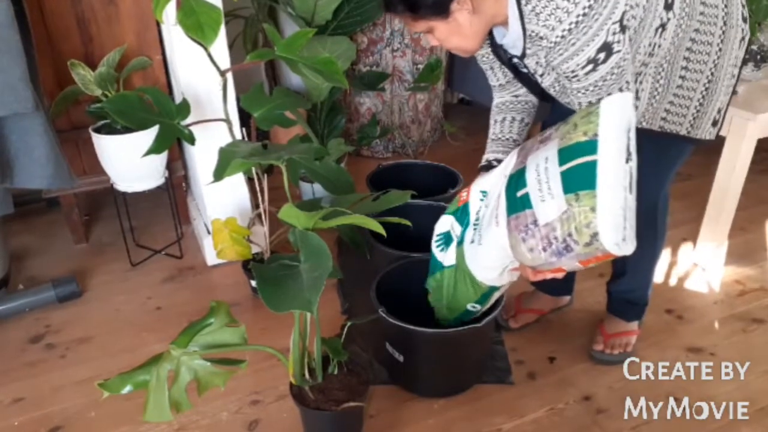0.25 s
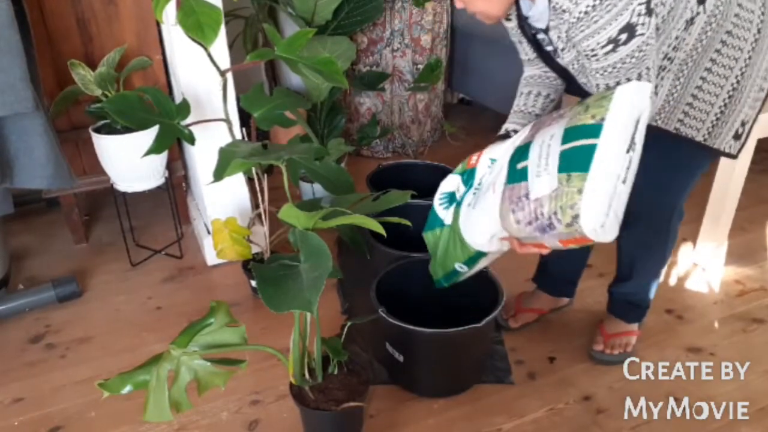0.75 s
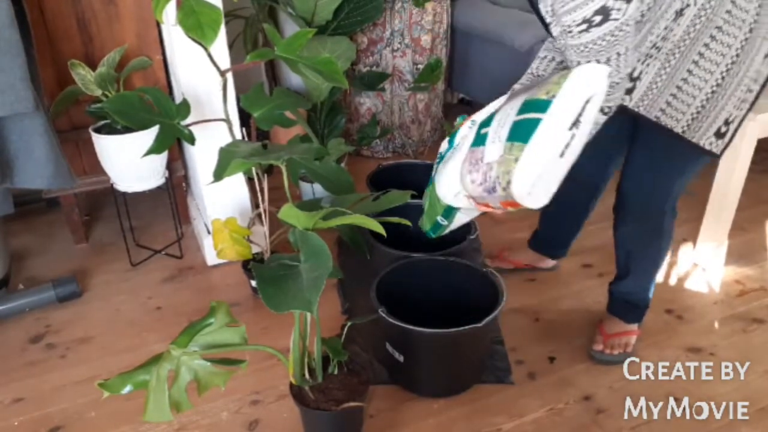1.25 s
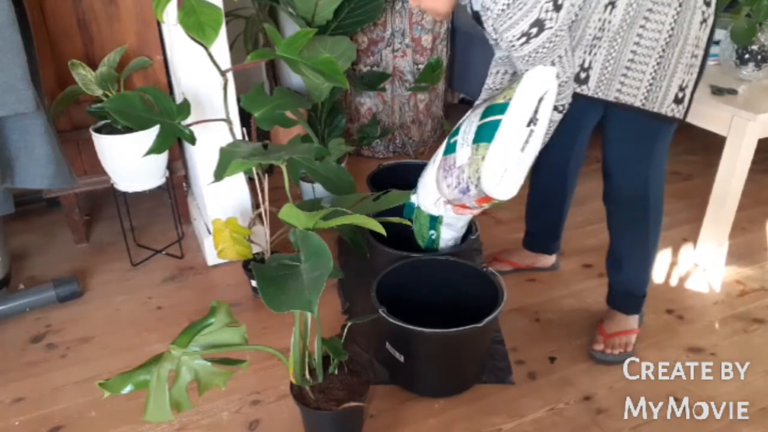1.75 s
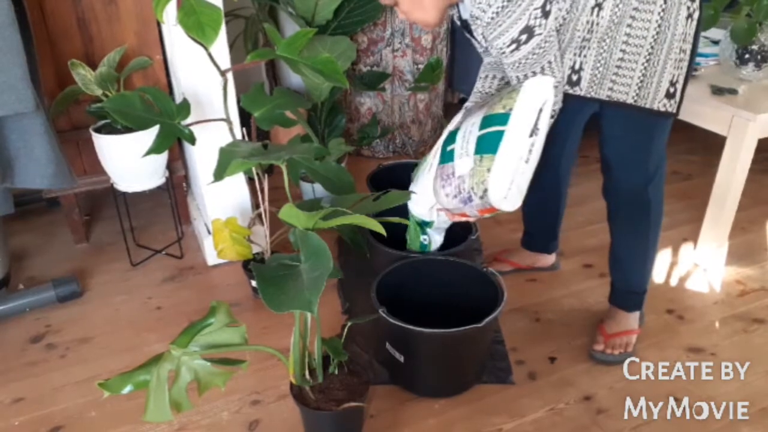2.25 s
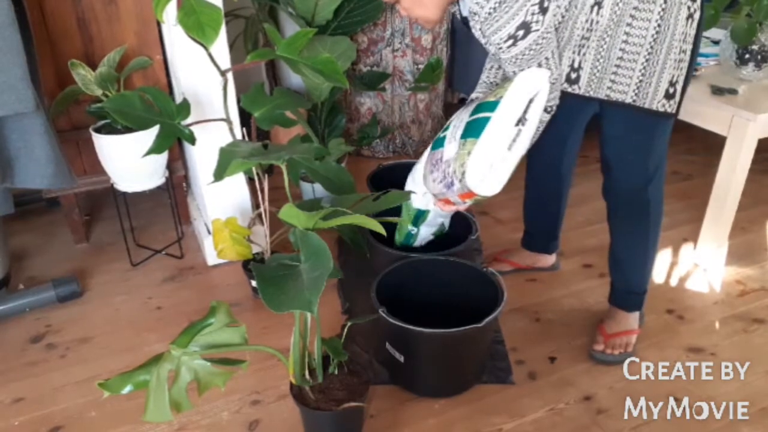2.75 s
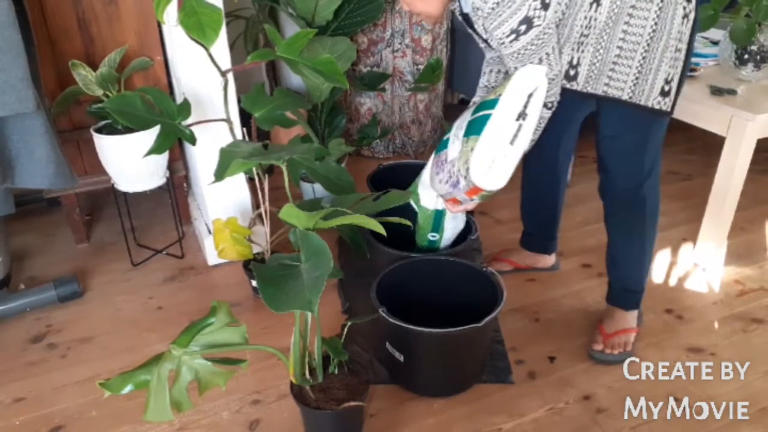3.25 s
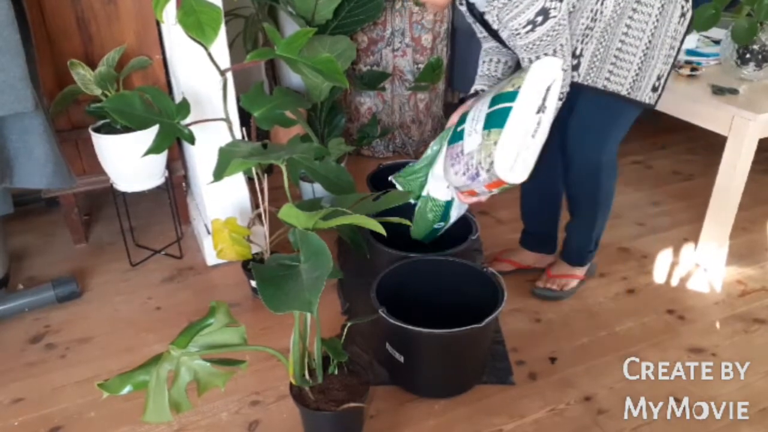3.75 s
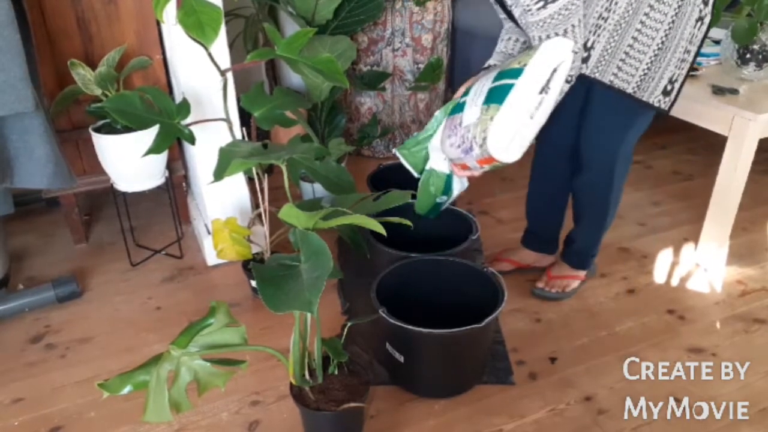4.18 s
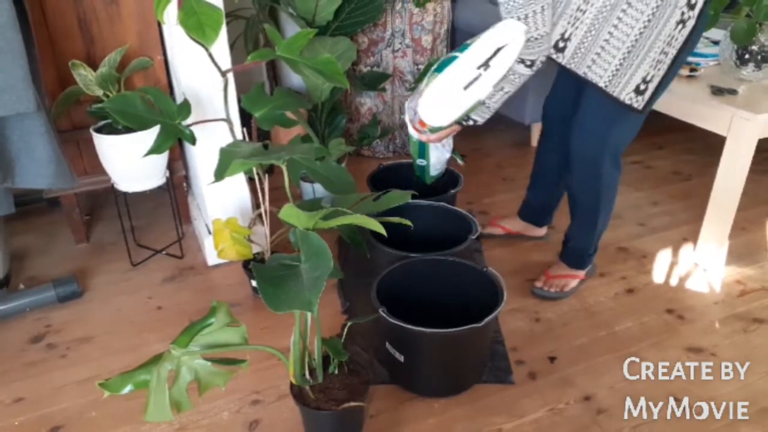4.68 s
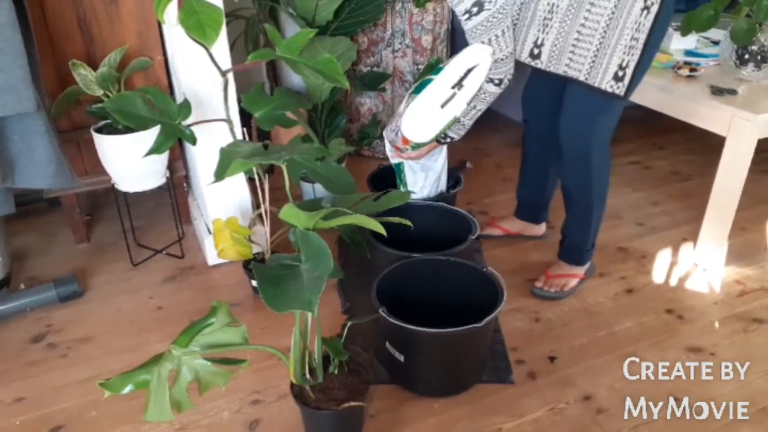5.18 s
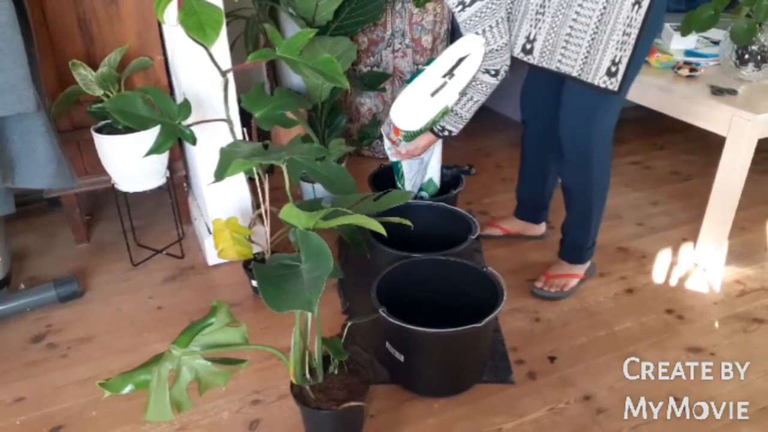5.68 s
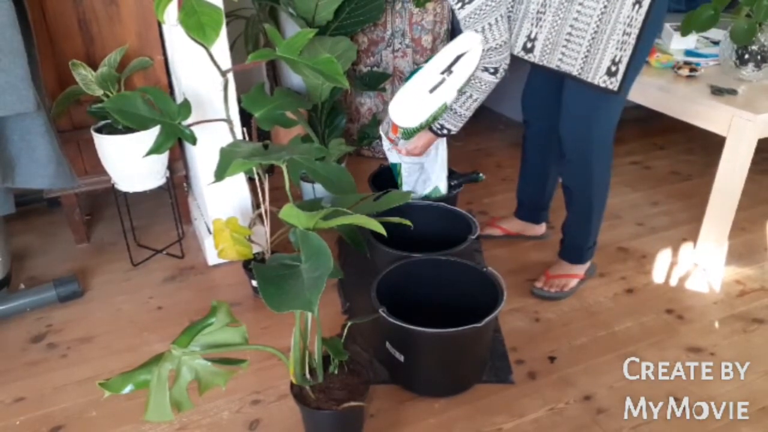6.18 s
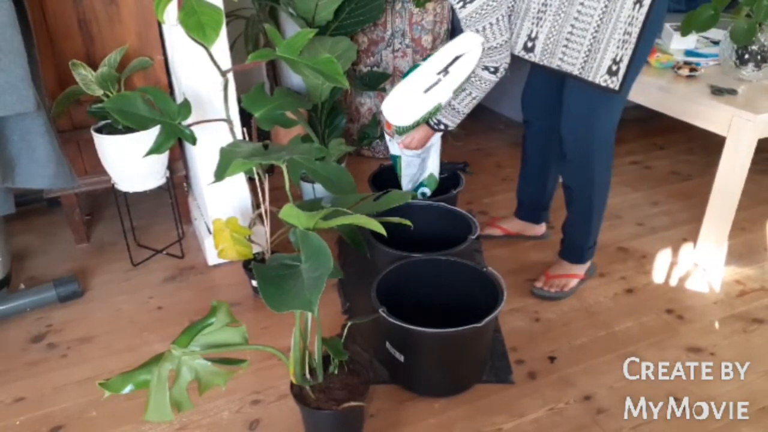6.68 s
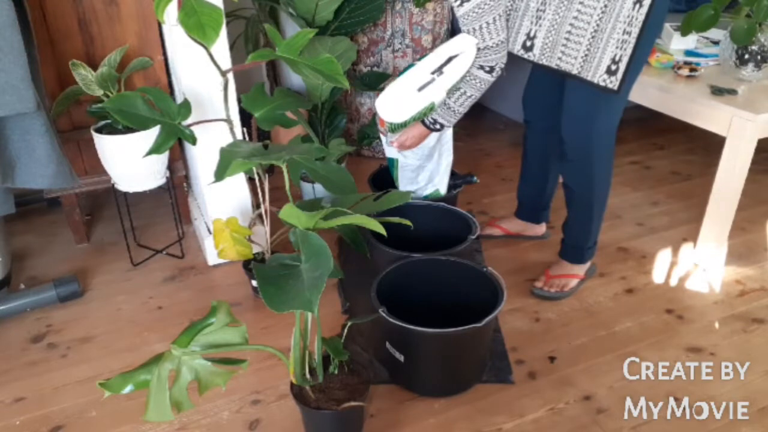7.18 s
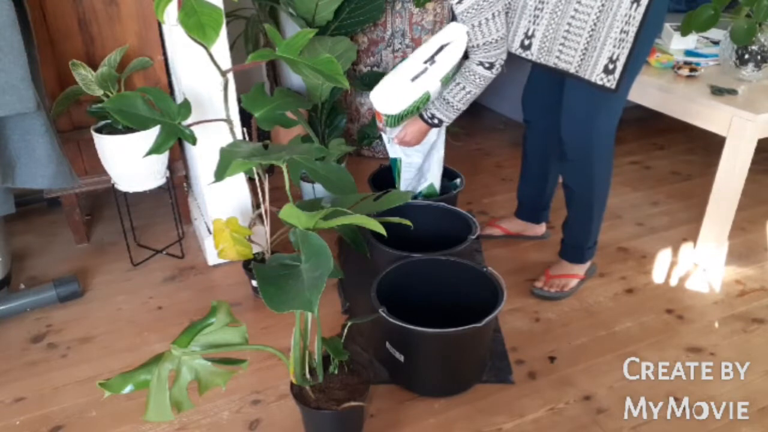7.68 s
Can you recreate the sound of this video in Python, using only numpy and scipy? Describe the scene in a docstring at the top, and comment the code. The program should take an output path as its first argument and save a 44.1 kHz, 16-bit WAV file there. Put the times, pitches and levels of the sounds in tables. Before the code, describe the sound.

Soil pours in uneven bursts from a rustling plastic bag, landing in plastic pots with knocks and hollow thumps.

```python
"""Potting soil shaken into pots

A plastic bag of soil is shaken over deep plastic pots in a room with a wooden floor.
The film crinkles and snaps as its creases let go. Crumbs patter and clods knock on the pot wall,
the air in the pot booms under the sliding soil, and heavy loads thud on the pot bottom."""
import sys
import numpy as np
from scipy import signal
from scipy.fft import rfft, irfft
from scipy.io import wavfile
from scipy.ndimage import uniform_filter1d

SR = 44100
rng = np.random.default_rng(int(sys.argv[2]) if len(sys.argv) > 2 else 0)


def generate_wav(signal):
    """Clip the signal to [-1, 1] and save it as 16-bit WAV at the path in sys.argv[1]."""
    frames = np.transpose(np.atleast_2d(signal))
    scaled = np.clip(frames, -1, 1) * 32767
    pcm = np.round(scaled).astype(np.int16)
    wavfile.write(sys.argv[1], SR, pcm)


N = 349713

# shakes of the bag: peak t/s, hold/s, crinkle/dB, patter/dB, pot air boom/dB, rise/s, fall/s
BAG_MOVES = [(0, 0.28, -49.5, -45.5, -47, .1, 0.31), (.5, 0.027, -57, -50.5, -48, 0.096, 0.23),
             (.804, .002, -66, -60.5, -90, 0.0045, 0.13), (0.998, .01, -62, -78, -82, 0.069, 0.11),
             (1.279, .005, -55.5, -50, -61.5, 0.1, .08), (1.59, 0.079, -39.5, -38.5, -47, 0.24, 0.65),
             (2.014, 0.013, -53.5, -45.5, -41, 0.99, 0.22), (2.19, 0.036, -73, -55.5, -52.5, 0.085, 0.26),
             (2.439, 0.0018, -59, -60, -57, 0.0022, 0.017), (2.518, 0.016, -56, -51.5, -51, 0.1, 0.43),
             (2.795, 0.071, -49.5, -46.5, -47.5, 0.23, 1), (3.114, .2, -51, -50.5, -52.5, 0.14, 0.38),
             (3.64, 0.077, -62.5, -69, -69, 0.042, 0.08), (3.785, .01, -59, -54.5, -44, 0.026, 0.23),
             (4.149, .002, -57, -63.5, -55, .004, 0.1), (4.25, 0.22, -65.5, -71, -64.5, 0.09, .09),
             (4.55, 0.058, -99, -76, -67, 0.14, 0.11), (4.716, 0.055, -65.5, -60, -58, 0.11, 0.23),
             (4.836, 0.09, -59, -58, -64, .01, 0.28), (4.965, .01, -47, -49, -50.5, 0.096, 0.32),
             (5.097, 0.022, -44.5, -41, -41, .1, 0.93), (5.493, 0.28, -55, -56, -63, 0.46, .5),
             (5.939, 0.38, -53.5, -52.5, -54.5, 0.061, 0.43), (6.498, .005, -61, -53.5, -50, 0.066, 0.26),
             (6.651, 0.027, -56.5, -53.5, -53.5, .1, 0.34), (7.1, 0.13, -49, -47.5, -47, 0.4, 0.56),
             (7.426, .005, -53, -49.5, -62, 0.062, 0.13), (7.618, 0.09, -56, -55, -53.5, 0.02, 0.19),
             (7.92, .01, -56.5, -52.5, -54.5, 0.61, .1)]
# single creases popping: t/s, level/dB, top band relative to main band/dB
CREASE_SNAPS = [(0.2524, -41, -10), (0.495, -37, -7), (0.7317, -52.5, 0), (0.8031, -44, -19.5),
                (.982, -54, -4), (1.2146, -54, -10), (1.387, -45, 12), (1.4167, -30.5, -12),
                (1.595, -22.5, 2), (1.8627, -26.5, -1), (2.2548, -48, -8), (2.436, -41.5, 1),
                (2.493, -38.5, -12), (2.5086, -48, -6), (2.533, -32, -7), (2.553, -32.5, 1.5),
                (2.584, -42, -6), (2.6984, -30, -7), (2.729, -35, -6), (2.7337, -35, 0), (2.7875, -33, 4),
                (2.794, -28, -9), (2.8014, -30, 3), (2.812, -30, -8), (2.902, -39, -1), (2.93, -40, -1),
                (3.075, -40, 1), (3.3185, -27, -18), (3.505, -40, -16), (3.6215, -35.5, -12),
                (3.6563, -39, -10.5), (3.799, -41, -1), (4.0347, -52, -20), (4.15, -42, -1),
                (4.235, -37, -6), (4.329, -54, -2.5), (4.8382, -38.5, -13.5), (4.914, -45, -6),
                (4.968, -36, 7.5), (5.0524, -32, -3), (5.097, -23, -6), (5.355, -28, -14), (5.951, -38, -6),
                (6.5073, -34, 2), (7.0913, -39, 10), (7.196, -33, 4), (7.33, -34, -4), (7.44, -37, -4),
                (7.6256, -41, -10), (7.6854, -33.5, -3)]
# sudden slides of soil against the pot wall: t/s, front/dB, patter behind it/dB, hold/s, fall/s
SOIL_SLIDES = [(.163, -41, -45.5, .02, 0.069), (0.634, -51, -55.5, 0.032, 0.052),
               (1.546, -23.5, -32.5, .16, 0.11), (2.168, -50, -47, 0.032, 0.06),
               (3.421, -40.5, -47, .005, 0.19), (3.792, -46, -47, 0.048, 0.11),
               (4.692, -56, -65, .01, 0.084), (5.097, -20, -35.5, 0.023, 0.5)]
# heavy loads landing in the pot: t/s, bottom thud/dB, air boom/dB, landing time/s
SOIL_LOADS = [(0.131, -60, -31, 0.0074), (1.269, -66, -42, 0.019), (1.55, -53, -24.5, .012),
              (1.623, -36, -13.5, 0.025), (1.66, -25, -21.5, 0.037), (1.981, -45.5, -50, 0.034),
              (2.159, -46.5, -43, 0.02), (3.047, -53.5, -69, 0.036), (3.785, -41.5, -35, 0.017),
              (3.815, -40.5, -30.5, .03), (4.69, -50.5, -45, 0.0174), (5.093, -39, -19.5, 0.014),
              (5.121, -31.5, -18.5, 0.053), (7.242, -64, -36, 0.0084), (7.849, -60, -45, 0.038)]
# clods hitting the pot wall: t/s, level/dB, centre f/Hz
CLOD_KNOCKS = [(.162, -29, 900), (.545, -39, 1270), (.629, -48, 1120), (.803, -41, 1900), (1.136, -50, 900),
               (1.258, -40, 1160), (1.388, -43, 1750), (1.544, -10, 1900), (1.551, -18, 2800),
               (2.18, -40, 1100), (2.491, -40, 1340), (2.511, -40, 900), (2.793, -33, 1170),
               (3.313, -33, 1600), (3.416, -35, 1200), (3.768, -52, 1000), (3.789, -34, 900),
               (3.799, -33, 1500), (3.833, -26, 1000), (4.036, -54, 1600), (4.124, -56, 800),
               (4.234, -48, 3200), (4.693, -46, 920), (5.051, -33, 920), (5.089, -30, 1500),
               (5.0955, -12, 900), (5.949, -37, 1510), (7.613, -46, 1230)]
# tone of the plastic film: f/Hz, level/dB
FILM_SPECTRUM = [(1100, -20.5), (1700, 0.5), (2600, -1), (4000, 0.5), (6500, -3), (9000, -1.5),
                 (12500, -8.5), (16000, -11.5)]
# tone of the pot wall under crumbs: f/Hz, level/dB
WALL_SPECTRUM = [(100, -37), (200, -3.5), (400, -5.5), (650, 1.5), (1000, -3.5), (1700, -3.5), (2700, -15),
                 (5000, -54.5)]
# resonances of the air in the pot: f/Hz, width/Hz, level/dB
AIR_MODES = [(258.2, 116, -7.5), (309.4, 73, -6.5), (338, 50, -8), (394, 59, -20.5)]
# resonances of the pot bottom: f/Hz, width/Hz, level/dB
BOTTOM_MODES = [(61.5, 19, -14.5), (110.8, 53, -4), (161, 41, -0.5)]
# reverb time of the room: f/Hz, T60/s
ROOM_DECAY = [(150, 0.42), (500, 0.41), (2000, 0.24), (6000, 0.33), (14000, 0.62)]
# room tone: f/Hz, level/dB
HUSH_SPECTRUM = [(40, -18), (100, -2), (200, 7.5), (340, 6.5), (600, -3.5), (2000, -9.5), (8000, -17),
                 (16000, -17)]

SWING_DB, BEND = 24, 1.043  # rise and fall times span this swing, steepening away from the peak
SLIDE_RISE_S, FRONT_FALL_S = 0.003, 0.024
TRICKLE_THUD_DB = -21  # shaking of the bottom, relative to the patter
IDLE_BOOM_DB = -74  # the air in the pots hums faintly with the room
REVERB_DB, HUSH_DB = -7.5, -71.5
DIP_HZ, DIP_WIDTH_HZ, DIP_DB = 10140, 1080, -5
LOW_CUT_HZ, HIGH_CUT_HZ = 61, 15850


def bag_rustle(crinkle_db, patter_db):
    """Dense tiny creases rustle: brighter when crinkling dominates, duller when patter is louder."""
    creases = grains(9000, spread_db=0.49, clump_db=1.89, clump_s=0.014)
    rustle = evened(colour(creases, FILM_SPECTRUM)) + gain_of(-11.5) * crinkles(per_s=500, sizes=6)
    low = signal.lfilter(*signal.butter(2, 6000, fs=SR), rustle)
    high = rustle - low
    tilt_db = -3 + 0.22 * np.clip(crinkle_db - patter_db, -20, 20)
    return gain_of(crinkle_db) * (low * gain_of(-tilt_db / 2) + high * gain_of(tilt_db / 2))


def crinkles(per_s, sizes):
    """Sparse small pops, each crease size with its own pitch."""
    out, t = np.zeros(N), np.arange(64) / SR
    for hz in np.geomspace(3000, 14000, sizes):
        pop = np.sin(2 * np.pi * hz * t) * np.exp(-t * hz / 0.63) * np.sqrt(hz)
        clicks = grains(per_s / sizes, spread_db=4.5, clump_db=5.5, clump_s=0.012)
        level_db = curve_at(FILM_SPECTRUM, hz) + 10 * np.log10(hz)
        out += gain_of(level_db) * np.convolve(clicks, pop)[:N]
    return evened(out)


def bag_snaps():
    """One crease cracks, and its neighbours let go after it."""
    out = np.zeros(N)
    for s, db, top_db in CREASE_SNAPS:
        pop = burst(decay_s=0.0003, tail_db=-19, tail_s=0.023)
        snap = band(pop, 2600, 8840) + gain_of(top_db) * band(pop, 6000, 13000)
        add(out, s, gain_of(db) * snap)
    return out


def soil_trickle(patter_db, boom_db):
    """Crumbs tap the pot wall; lumps shake the air column and the bottom."""
    crumbs = grains(3000, spread_db=0.89, clump_db=1.77, clump_s=0.026)
    air_lumps = grains(1500, spread_db=0.9, clump_db=1.0, clump_s=0.043)
    bottom_lumps = grains(540, spread_db=3.8, clump_db=1.2, clump_s=0.046)
    patter = gain_of(patter_db) * evened(colour(crumbs, WALL_SPECTRUM))
    boom = ring(gain_of(boom_db) * air_lumps, AIR_MODES)
    # too light for the deepest mode
    rumble = ring(gain_of(patter_db + TRICKLE_THUD_DB) * bottom_lumps, BOTTOM_MODES[1:])
    return patter + boom + rumble


def load_thuds():
    """A broad load booms the pot air and moves the whole bottom, sounding its two deep modes."""
    out, t = np.zeros(N), np.arange(SR // 2) / SR
    for s, thud_db, boom_db, landing_s in SOIL_LOADS:
        weight = t / landing_s * np.exp(-2 * t / landing_s)  # builds up, then settles
        push = weight * rng.standard_normal(len(t))
        for db, modes in (thud_db, BOTTOM_MODES[:2]), (boom_db, AIR_MODES):
            body = ring(push, modes)
            add(out, s, gain_of(db) * body / abs(body).max())
    return out


def clod_knocks():
    """Clods knock on the wall and set the pot air ringing."""
    knocks = np.zeros(N)
    for s, db, hz in CLOD_KNOCKS:
        hit = burst(decay_s=0.0012, tail_db=-18, tail_s=0.02)
        add(knocks, s, gain_of(db) * band(hit, hz / 1.63, hz * 1.36))
    return knocks + gain_of(-12) * ring(knocks, AIR_MODES)


def shaking_levels():
    """Crinkle, patter and boom envelopes in dB, summed over all moves and slides."""
    t = np.arange(0, N + 32, 32) / SR
    power = np.array([[1e-12], [1e-12], [gain_of(2 * IDLE_BOOM_DB)]])
    for s, hold_s, *levels_db, rise_s, fall_s in BAG_MOVES:
        power = power + gain_of(levels_db)[:, None] ** 2 * swell(t - s, hold_s, rise_s, fall_s)
    for s, front_db, behind_db, hold_s, fall_s in SOIL_SLIDES:  # slides feed only the patter
        power[1] += gain_of(2 * front_db) * swell(t - s, 0, SLIDE_RISE_S, FRONT_FALL_S)
        power[1] += gain_of(2 * behind_db) * swell(t - s, hold_s, SLIDE_RISE_S, fall_s)
    return [np.interp(np.arange(N) / SR, t, 10 * np.log10(layer)) for layer in power]


def swell(t, hold_s, rise_s, fall_s):
    """Power of one gesture: rise until t = 0, hold, fall."""
    away = np.maximum(-t / rise_s, 0) + np.maximum((t - hold_s) / fall_s, 0)
    return gain_of(-2 * np.minimum(SWING_DB * away ** BEND, 200))


def grains(per_s, spread_db, clump_db, clump_s):
    """Random clicks, a few of them large, coming in clumps."""
    clump = evened(uniform_filter1d(rng.standard_normal(N), round(clump_s * SR)))
    size = gain_of(spread_db * np.minimum(rng.exponential(1, N), 5) + clump_db * clump)
    return evened(size * rng.standard_normal(N) * (rng.random(N) < per_s / SR))


def burst(decay_s, tail_db, tail_s):
    """A sharp crack of noise with a softer, longer tail."""
    t = np.arange(8192) / SR
    envelope = np.exp(-t / decay_s) + gain_of(tail_db) * np.exp(-t / tail_s)
    return envelope * rng.standard_normal(len(t))


def ring(x, modes):
    """Resonator bank, each filter run twice for steep skirts."""
    out = np.zeros(len(x))
    for hz, width, db in modes:
        b, a = signal.iirpeak(hz, hz / width, SR)
        out += gain_of(db) * np.sqrt(SR / width) * signal.lfilter(b, a, signal.lfilter(b, a, x))
    return out


def colour(x, spectrum):
    """Minimum-phase EQ: all ringing comes after the click."""
    hz = abs(np.fft.fftfreq(4096, 1 / SR))
    log_gain = np.log(gain_of(curve_at(spectrum, hz)))
    response = np.exp(np.conj(signal.hilbert(log_gain)))
    return signal.oaconvolve(x, np.fft.ifft(response).real[:2048])[:N]


def band(x, lo_hz, hi_hz):
    """Band-pass scaled to peak 1."""
    x = signal.lfilter(*signal.butter(3, [lo_hz, hi_hz], "band", fs=SR), x)
    return x / abs(x).max()


def curve_at(points, hz):
    """Reads a table along a log frequency axis."""
    f, value = np.transpose(points)
    return np.interp(np.log(hz + 1), np.log(f + 1), value)


def add(mix, s, sound):
    """Drops a sound into the mix at s seconds."""
    part = mix[round(s * SR):][:len(sound)]
    part += sound[:len(part)]


def gain_of(db):
    """Decibels to amplitude."""
    return 10 ** (np.asarray(db) / 20)


def evened(x):
    """Scales to rms 1."""
    return x / np.sqrt(np.mean(x ** 2) + 1e-20)


def room_reverb(x):
    """Three echo tails, each band dying at its own speed, crossfade to keep ringing tones away."""
    wet, t = np.zeros(N), np.arange(N) / SR
    for k in range(3):
        taps = np.zeros(SR // 2)
        slots = np.arange(130, len(taps) - 20, 20)
        taps[slots + rng.integers(0, 20, len(slots))] = rng.choice([-1., 1.], len(slots))
        hz, age_s, bands = signal.stft(taps, SR, nperseg=256)
        decay = gain_of(-60 * age_s / curve_at(ROOM_DECAY, hz)[:, None])
        tail = signal.istft(bands * decay, SR, nperseg=256)[1]
        crossfade = np.sqrt(2 / 3) * np.cos(2 * np.pi * 3 * t + k * np.pi / 3)
        wet += signal.fftconvolve(x * crossfade, tail / np.linalg.norm(tail))[:N]
    return (x + gain_of(REVERB_DB) * wet) / np.sqrt(1 + gain_of(2 * REVERB_DB))


def room_hush():
    """A faint, steady bed of dark noise."""
    return gain_of(HUSH_DB) * evened(colour(rng.standard_normal(N), HUSH_SPECTRUM))


def scene():
    """Bag and pot in the room, over its hush."""
    crinkle_db, patter_db, boom_db = shaking_levels()
    bag = bag_rustle(crinkle_db, patter_db) + bag_snaps()
    pot = soil_trickle(patter_db, boom_db) + load_thuds() + clod_knocks()
    return (room_reverb(bag + pot) + room_hush())[None]


def record(dry):
    """Microphone colour: a dip near 10 kHz, with the deep bass and the very top cut away."""
    hz = np.fft.rfftfreq(N, 1 / SR)
    dip = gain_of(DIP_DB * np.exp(-((hz - DIP_HZ) / DIP_WIDTH_HZ) ** 2))
    dipped = irfft(rfft(dry) * dip, N)
    thin = signal.lfilter(*signal.butter(3, LOW_CUT_HZ, "high", fs=SR), dipped)
    high_cut = signal.firwin(1023, HIGH_CUT_HZ, window=("kaiser", 10), fs=SR)
    return signal.oaconvolve(thin, high_cut[None], "same")


dry = scene()
out = record(dry)
generate_wav(out)
```